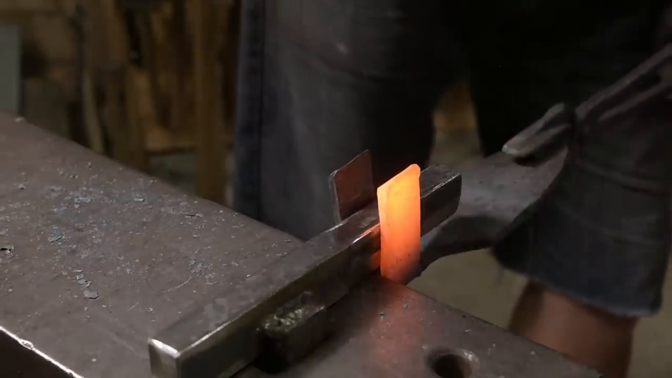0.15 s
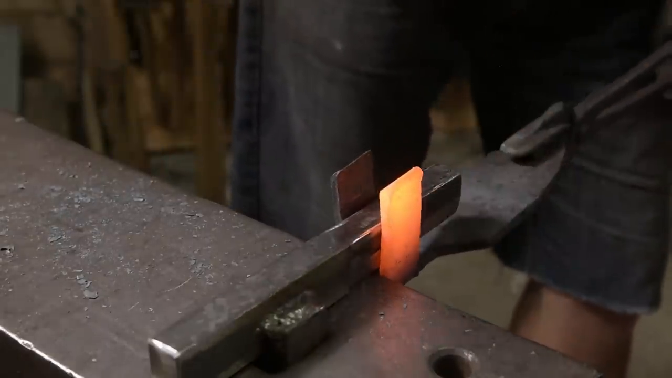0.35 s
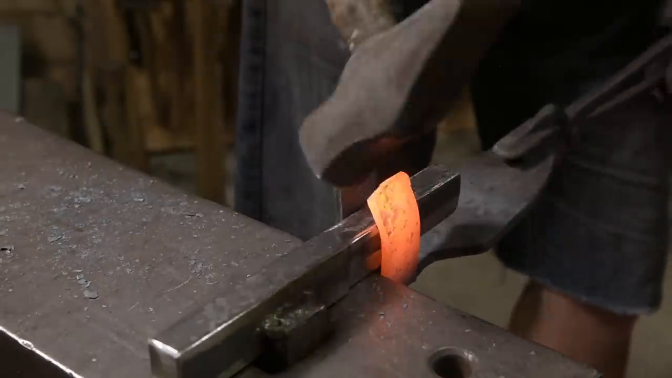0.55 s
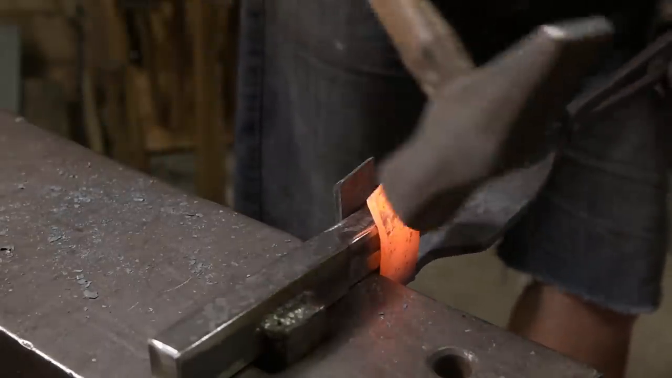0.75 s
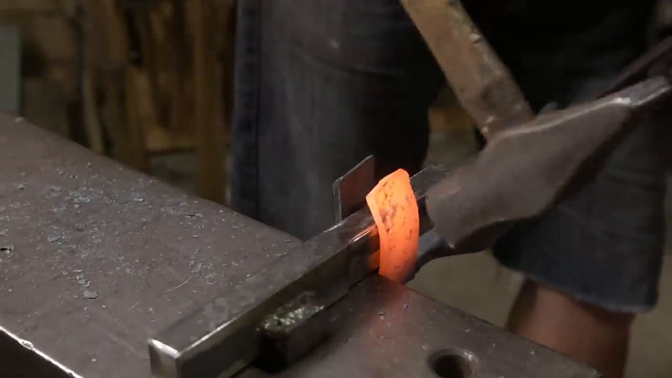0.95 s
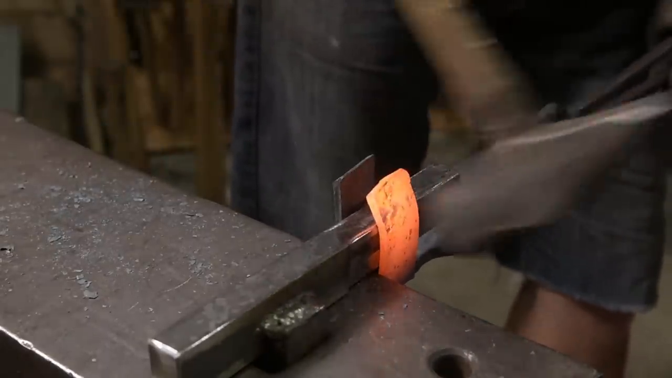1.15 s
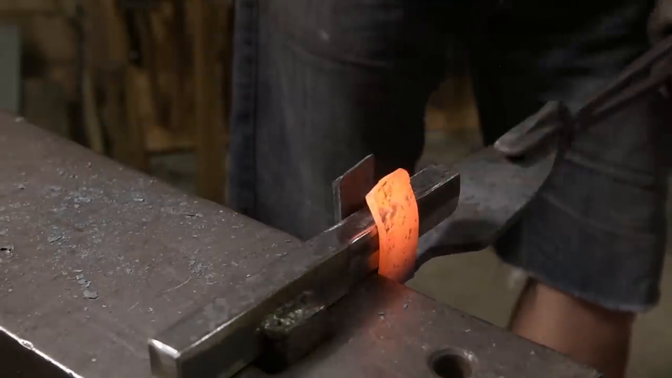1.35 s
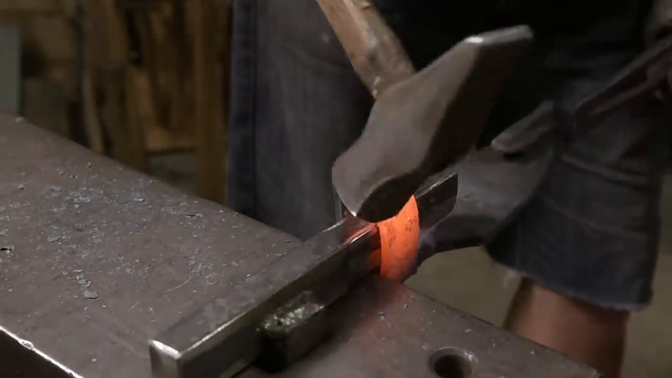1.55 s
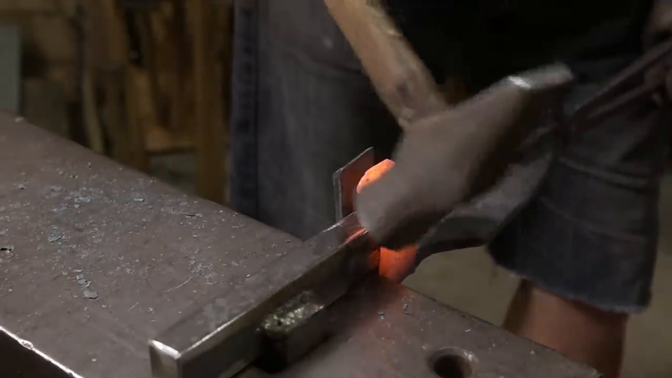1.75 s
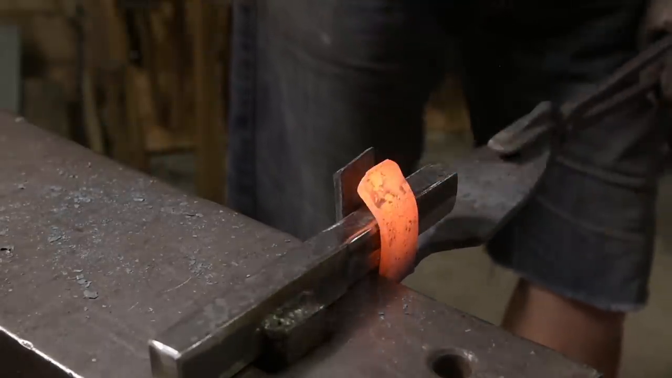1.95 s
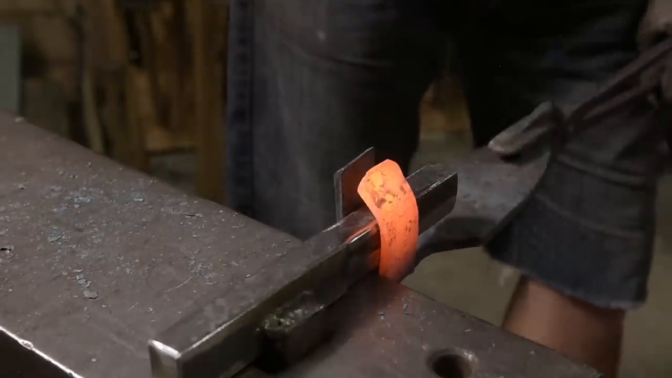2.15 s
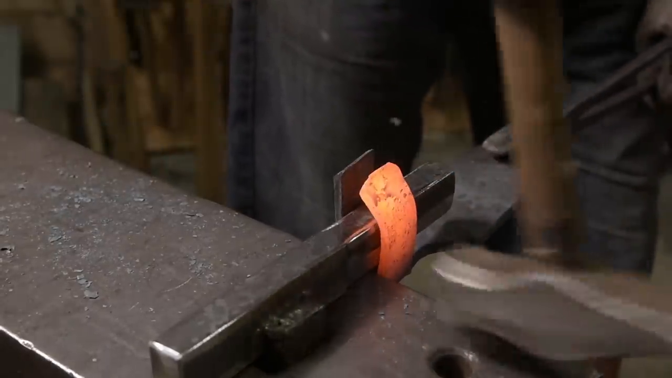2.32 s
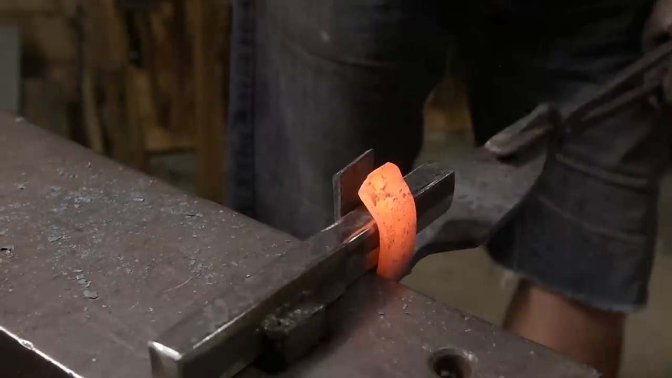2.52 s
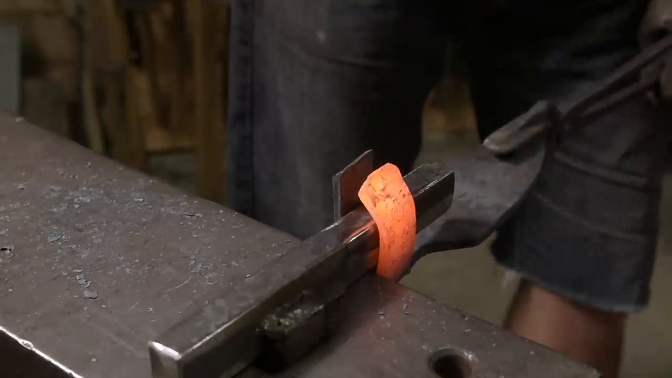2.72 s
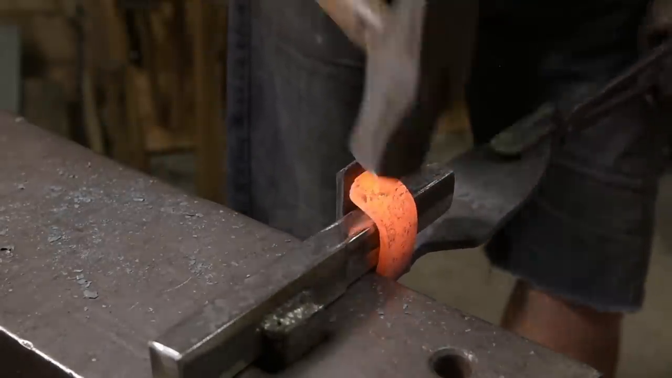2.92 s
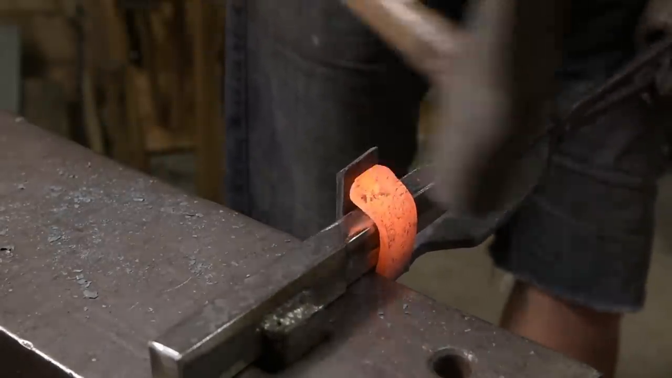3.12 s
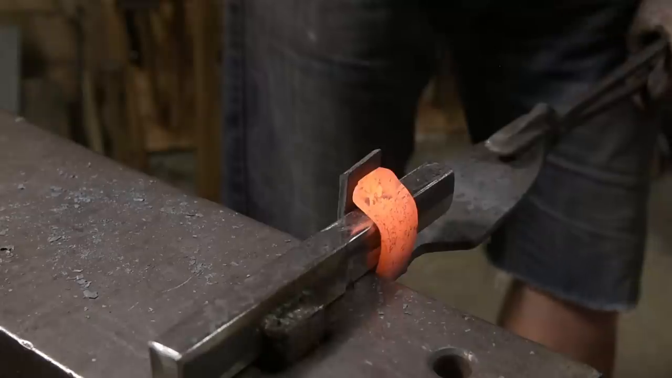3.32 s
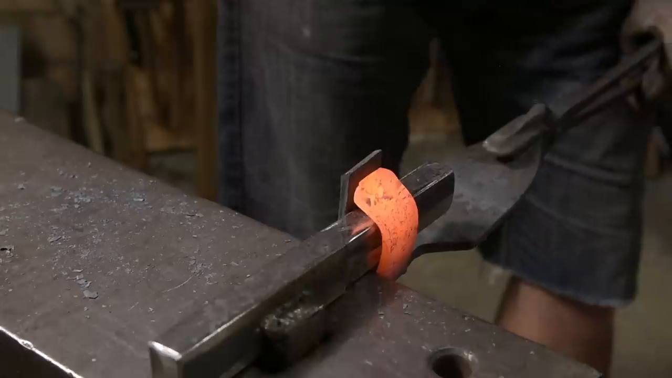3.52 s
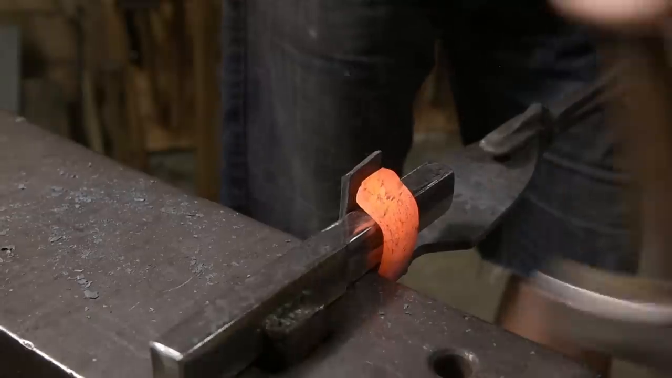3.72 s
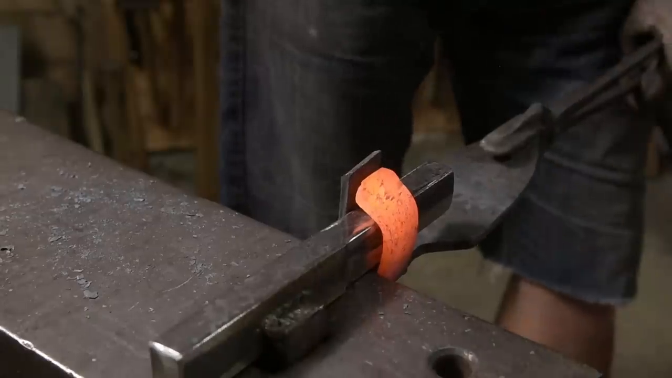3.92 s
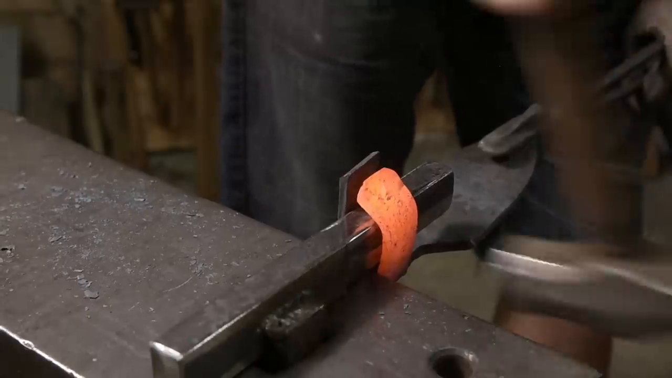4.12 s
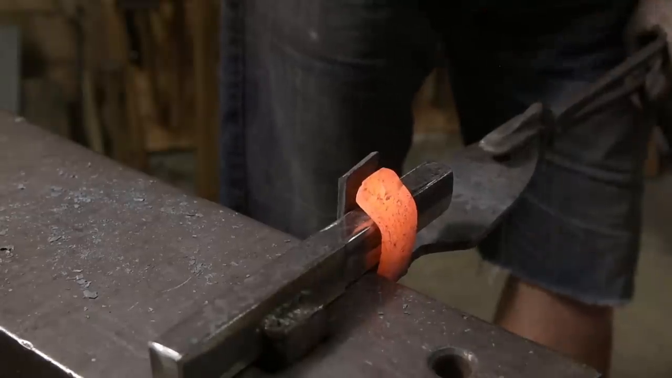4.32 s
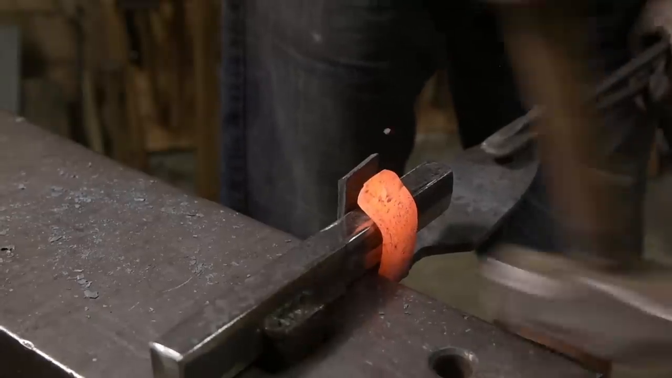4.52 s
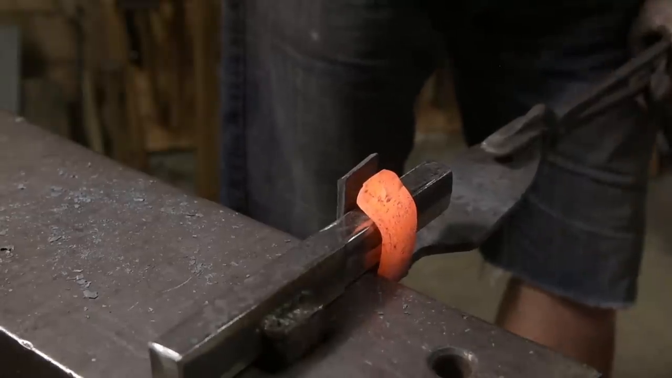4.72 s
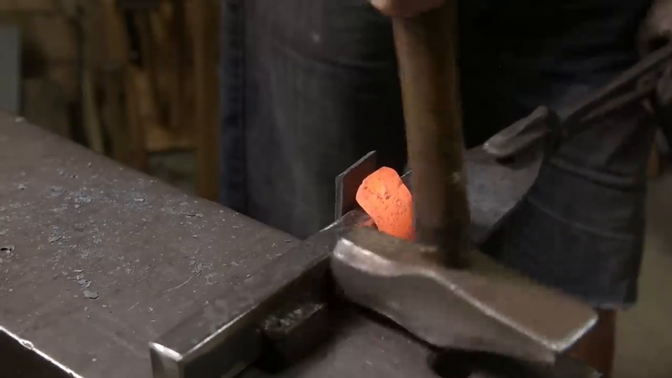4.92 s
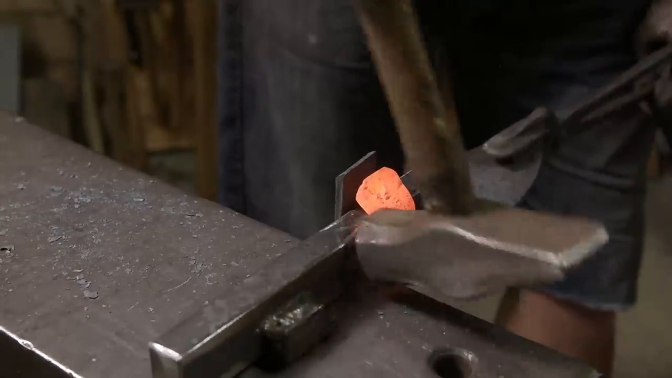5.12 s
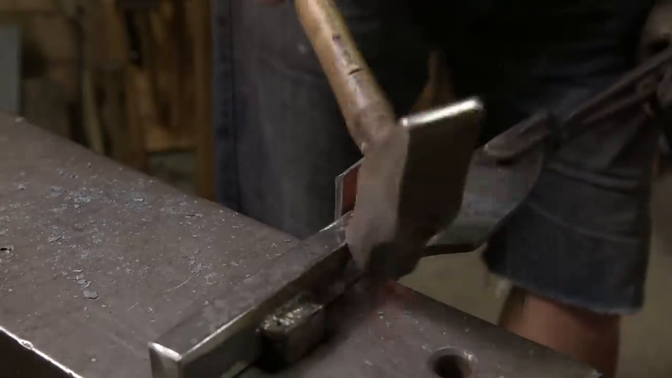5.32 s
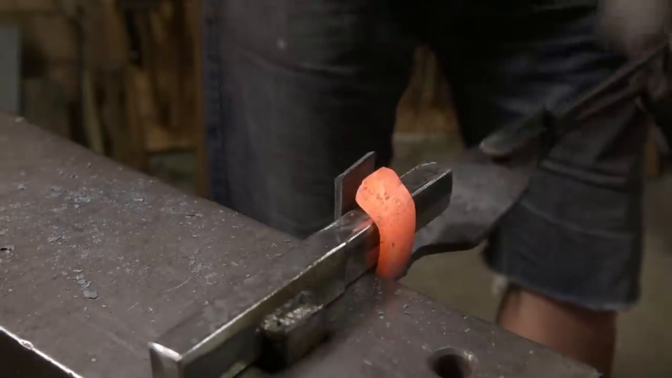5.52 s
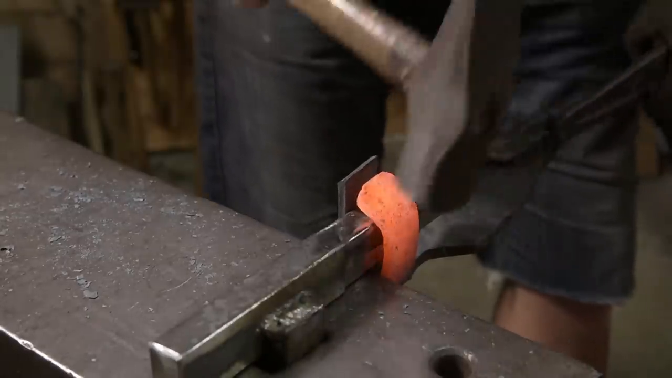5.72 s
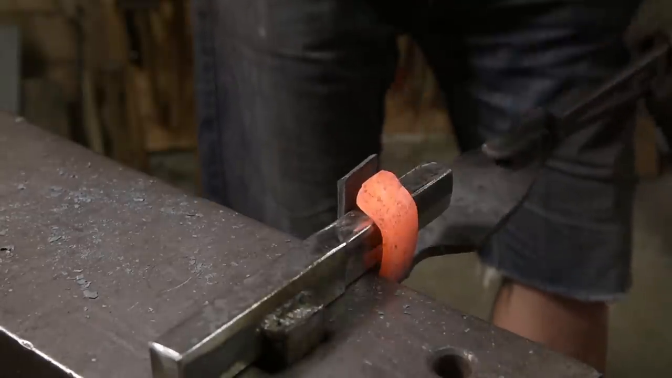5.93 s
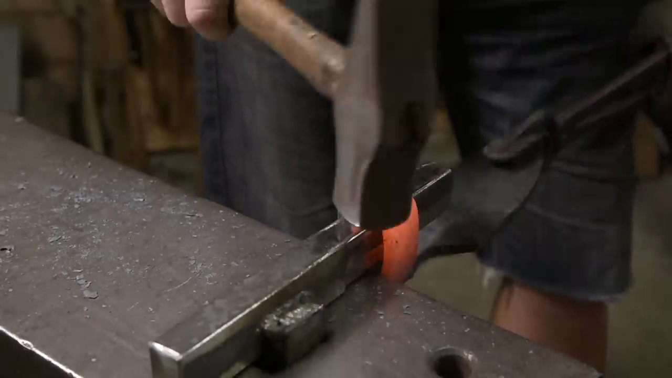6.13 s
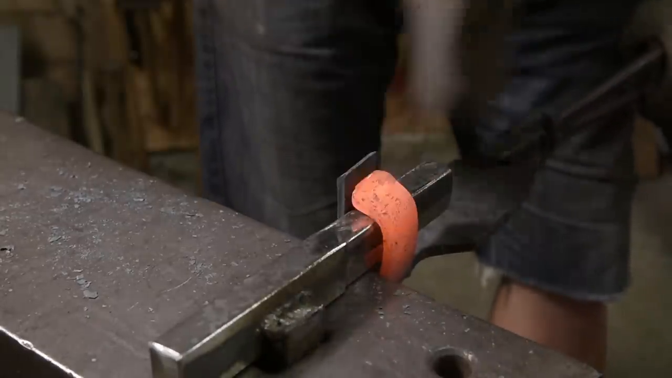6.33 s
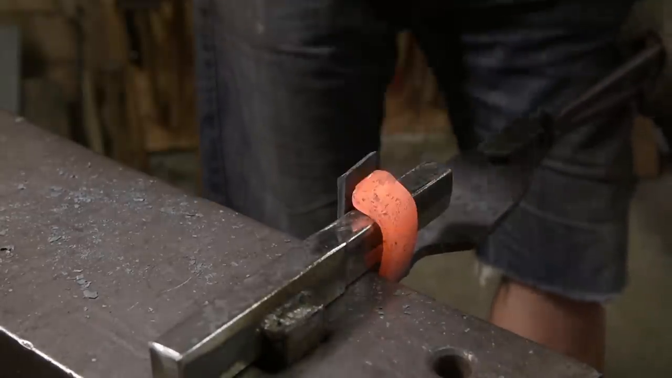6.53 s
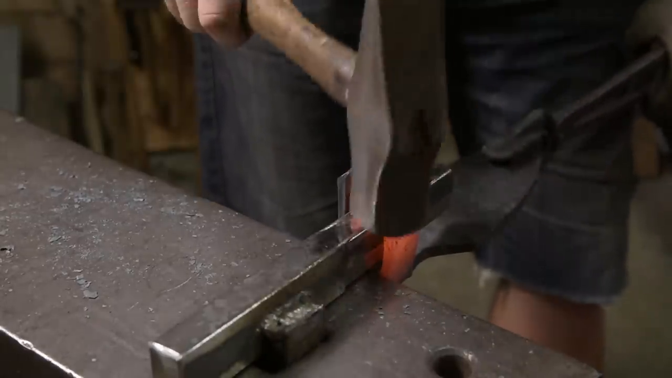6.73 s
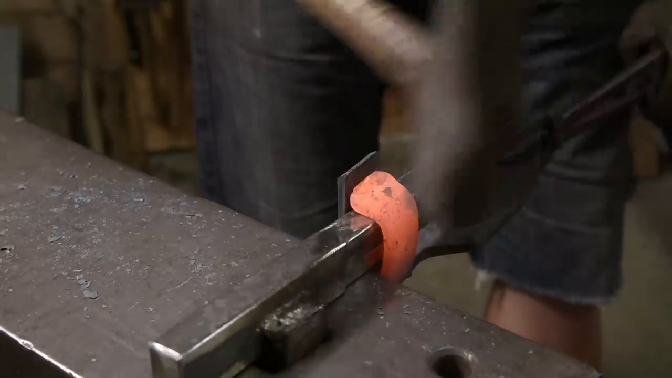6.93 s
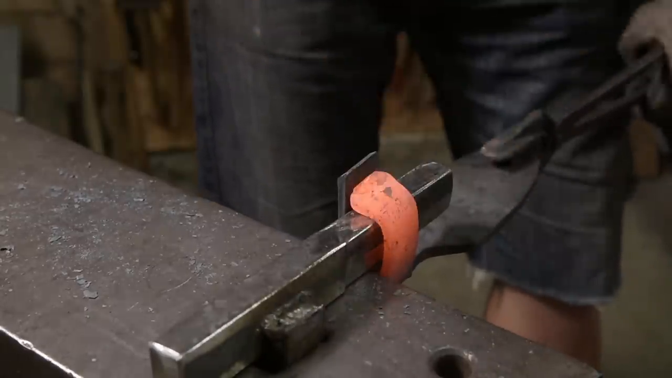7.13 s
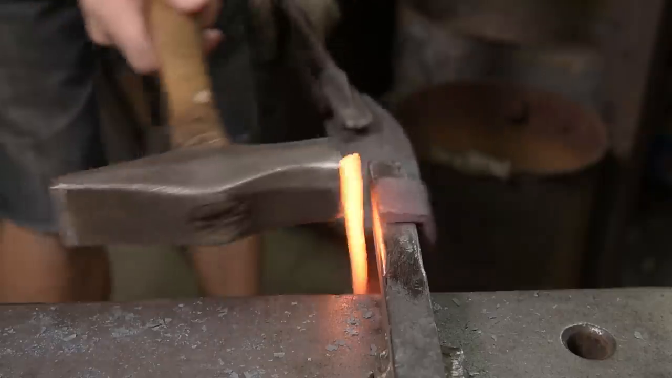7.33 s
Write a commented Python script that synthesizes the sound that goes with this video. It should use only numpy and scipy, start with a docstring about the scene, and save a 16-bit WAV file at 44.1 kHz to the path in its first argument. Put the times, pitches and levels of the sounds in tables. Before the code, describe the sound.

Close, dry hammer blows on glowing steel, some knocking sideways, some thudding, with light anvil taps, brief ringing and faint tong clinks.

```python
"""In a small smithy a hand hammer forges hot steel, held in tongs on an anvil, heard close up.
Each blow is a noise crack plus a bank of decaying sines for the well-damped anvil: blows from above thud
into the stand, blows from the side knock the tongs. At times the hammer drops back on the bare anvil.
The tongs clink and scrape as the work is turned. The shop adds a short diffuse tail, over a low rumble
of filtered noise with machine hum. Hard blows duck a limiter, and their first peaks overload."""
import sys
import numpy as np
from scipy import signal
from scipy.fft import rfft, irfft
from scipy.io import wavfile
from scipy.ndimage import uniform_filter1d

SR = 44100
rng = np.random.default_rng(int(sys.argv[2]) if len(sys.argv) > 2 else 0)


def unload_audio(sound):
    """Save the sound as a 16-bit wav file, at the path given as the first command line argument."""
    columns = np.transpose(np.atleast_2d(sound))
    # keep every value between -1 and 1, then stretch to whole-number steps
    steps = np.round(np.clip(columns, -1, 1) * 32767)
    wavfile.write(sys.argv[1], SR, steps.astype(np.int16))


N = 328986  # length in samples

RING_GROWTH = 0.55  # the ring grows more slowly than the strike: dB of ring per dB of strength


def amp(db):
    """Decibels to gain."""
    return 10 ** (np.asarray(db) / 20)


def evened(x):
    """Scales to rms 1."""
    return x / np.sqrt(np.mean(x ** 2) + 1e-20)


def read(points, hz):
    """Reads a (f/Hz, value) curve on a log-frequency axis."""
    f, value = np.transpose(points)
    return np.interp(np.log(hz + 1), np.log(f + 1), value)


def add(mix, s, sound):
    """Mixes a sound in at time s, in seconds."""
    part = mix[round(s * SR):][:len(sound)]
    part += sound[:len(part)]


def hammer(body_db=-0.5, fizz_db=1.3, ring_db=-11, side_power=4, ring_treble_share=1.1):
    """Every blow on the hot work is a crack, coloured by its angle, with the ring of the anvil."""
    # blows; the struck spot favours three anvil modes, the strongest first:
    # (t/s, strength/dB, angle from upright/deg, crack t60/s, treble/dB,
    #  clank f/Hz, clank/dB, mode lift/dB, three mode f/Hz)
    blows = [ (.4948, -12, 33, .017, -2, 1797, 3, 7, 2414, 5390, 9650),
             (1.1338, -27, 18, 0.044, 0.5, 2270, 2, 19, 2296, 3994, 3311),
             (1.5694, -11.5, 48, .019, 0.5, 3850, 10, 21.3, 2371, 3531, 4330),
             (2.321, -5.5, 73, 0.019, -1, 2570, 8, 21, 13033, 1319, 5620),
             (2.9653, -8.5, 43, 0.028, -2, 1198, 4, 14, 1307, 4900, 3774),
             (3.7196, -7.5, 84, 0.021, 1, 2400, 3, 17, 1365, 1190, 7838),
             (4.1515, -6.5, 90, .026, 3.5, 3140, 4.5, 7.8, 2800, 8520, 13033),
             (4.5469, -7.5, 83.4, 0.025, 0.5, 1080, 4.6, 19.6, 2800, 1365, 11555),
             (4.9205, -12, 82, 0.033, -5.5, 1910, 2.9, 20.4, 2450, 1365, 3994),
             (5.7813, -11.5, 15.2, 0.021, -1, 1400, 6.4, 13, 2363, 1529, 4900),
             (6.153, -12.5, 2, .018, 0, 1900, 2.6, 10, 5400, 2400, 3994),
             (6.6864, -10.8, 5, 0.032, -2, 1416, 5, 22, 2800, 1421, 3994)]
    # colour by angle: upright blows thud, glancing ones bite, side blows knock the tongs:
    # (angle/deg, thud/dB, knock/dB, bite/dB, air/dB)
    aim = [(0, 5, 2.5, 0, 2.5), (46, -3.5, -8.5, 2.5, -0.5), (91, -8.5, 8.5, 2, -3.5)]
    # modes brought out by a full side blow: (f/Hz, lift/dB)
    side_modes = [(627, 4), (11555, 18.5)]
    out = np.zeros(N)
    angles, *colours = np.transpose(aim)
    for s, strength_db, angle, t60, treble_db, clank_hz, clank_db, lift_db, *modes in blows:
        thud, knock, bite, air = (np.interp(angle, angles, column) for column in colours)
        colour = thud, knock, body_db, bite, fizz_db + treble_db, air + treble_db
        sideways = abs(angle / angles[-1]) ** side_power
        favoured = spot(lift_db, modes) + [(hz, sideways * db) for hz, db in side_modes]
        anvil_db = ring_db + RING_GROWTH * strength_db
        add(out, s, amp(strength_db) * crack(t60, colour, clank_hz, clank_db))
        add(out, s, ring(anvil_db, favoured, ring_treble_share * treble_db))
    return out


def crack(t60, colour_db, clank_hz, clank_db, rise=0.000089, clank_width=0.1,
          treble_hz=6000, treble_share=0.76, size=4096):
    """Hammer, work and tongs clash: dense modes, as shaped noise, that the soft hot steel damps quickly."""
    # spectrum of an average crack, before its colour: (f/Hz, relative level/dB)
    average = [(30, 13), (110, 26.5), (170, 24.5), (300, 27.5), (450, 26.5), (650, 30), (950, 31),
               (1350, 35), (2300, 35.5), (3000, 32.5), (4000, 31), (5200, 22.5), (8000, 20), (12000, 16),
               (16000, 11)]
    t, hz = np.arange(size) / SR, np.fft.rfftfreq(size, 1 / SR)
    burst = rng.standard_normal(size) * (1 - np.exp(-t / rise))
    # the treble lasts only a share of the time
    long_part = rfft(burst * amp(-60 * t / t60))
    short_part = rfft(burst * amp(-60 * t / (t60 * treble_share)))
    high = 1 / (1 + (treble_hz / (hz + 1)) ** 4)
    clash = (1 - high) * long_part + high * short_part
    # smoothed spectrum of the noise, divided out so that the crack follows its curves
    lumps_db = 10 * np.log10(uniform_filter1d(abs(clash) ** 2, size=37) + 1e-12)
    thud, knock, body, bite, fizz, air = colour_db
    colour = [(380, thud), (630, knock), (900, (thud + body) / 2), (1300, body),
              (2200, 0), (3900, bite), (7500, fizz), (13000, air)]
    clank = clank_db * np.exp(-(np.log((hz + 1) / clank_hz) / clank_width) ** 2)
    shape_db = read(average, hz) + read(colour, hz) + clank - lumps_db
    return irfft(clash * causal(shape_db))


def causal(db):
    """Minimum-phase response with the given gain: nothing sounds before the contact."""
    log_gain = np.log(amp(np.r_[db, db[-2:0:-1]]))
    return np.exp(np.conj(signal.hilbert(log_gain)))[:len(db)]


def ring(anvil_db, favoured, treble_db=0, treble_hz=4500):
    """All the anvil's modes ring briefly; favoured ones flash at the contact, then settle into the ring."""
    # modes of the anvil with work and tongs resting on it: (f/Hz, relative level/dB, t60/s)
    anvil = [(503, -30, .35), (627, -30, .38), (1190, -28, .36), (1319, -27, .36), (1365, -27, .4),
             (1421, -26, .38), (1529, -31, .3), (1860, -29, .38), (1965, -28, .38), (2296, -29, .25),
             (2371, -28, .3), (2400, -28, .3), (2450, -25, .34), (2800, -25, .46), (3311, -27, .26),
             (3531, -30, .33), (3774, -30, .28), (3994, -27, .4), (4330, -29, .38), (4900, -33, .34),
             (5390, -32, .24), (5620, -33, .26), (7838, -44, .3), (8070, -42, .25), (8520, -39, .33),
             (9650, -39, .28), (10900, -43, .18), (11555, -42, .35), (12314, -54, .25), (13033, -50, .3)]
    flash_db, flash_t60 = 6, 0.038  # level over the lift in dB, decay in s
    held_share = 0.8  # share of the lift, in dB, that the longer ring keeps
    t = np.arange(SR * 3 // 4) / SR
    hz, db, t60 = np.transpose(anvil)[:, :, None]
    lift = np.zeros_like(hz)
    for near_hz, lift_db in favoured:
        lift[np.argmin(abs(hz - near_hz))] += lift_db
    high = 1 / (1 + (treble_hz / hz) ** 4)
    scatter_db = 2 * rng.standard_normal(hz.shape)
    level = amp(db + anvil_db + treble_db * high + scatter_db)
    held = amp(held_share * lift - 60 * t / t60)
    flash = (amp(lift) - 1) * amp(flash_db - 60 * t / flash_t60)
    sign = rng.choice([-1, 1], len(hz))
    return sign @ (level * (held + flash) * np.sin(2 * np.pi * hz * t))


def spot(lift_db, modes, share=0.83):
    """Modes that a struck spot favours, each with a share of the lift before it: (f/Hz, lift/dB)."""
    return [(hz, lift_db * share ** rank) for rank, hz in enumerate(modes)]


def rebounds(body_db=3, bite_db=3, bite_share=0.48, air_db=-8, ring_db=-13, ring_treble_share=0.45):
    """The hammer drops on the bare face: a crack with more body and less air, and the face's own modes."""
    # drops: (t/s, strength/dB, crack t60/s, treble/dB, clank f/Hz, clank/dB, mode lift/dB, three mode f/Hz)
    drops = [ (3.083, -31.5, .02, -11, 2520, 10.2, 7, 2450, 1319, 1190),
             (3.754, -21, .02, -16.5, 1260, 13, 19.4, 1365, 2450, 1860),
             (4.597, -28, 0.027, -11, 1220, 13.4, 18, 2800, 1190, 1319),
             (5.0181, -11.5, 0.025, -10, 1435, 3, 16.6, 9650, 8520, 11555),
             (5.2021, -28, 0.053, -4, 2440, 7.5, 15, 12314, 2450, 503),
             (5.283, -36, 0.08, -23, 2450, 11, 13, 2450, 503, 1421)]
    # modes brought out by the bare face: (f/Hz, lift/dB)
    face_modes = [(503, 11.7), (1421, 6), (2450, 6)]
    # the hammer's weight lands with the same thud and knock whatever the strength
    landing_thud_db, landing_knock_db = -33.5, -30
    out = np.zeros(N)
    for s, strength_db, t60, treble_db, clank_hz, clank_db, lift_db, *modes in drops:
        thud, knock = landing_thud_db - strength_db, landing_knock_db - strength_db
        bite = bite_db + bite_share * treble_db
        colour = thud, knock, body_db, bite, treble_db, air_db + treble_db
        favoured = spot(lift_db, modes) + face_modes
        anvil_db = ring_db + RING_GROWTH * strength_db
        add(out, s, amp(strength_db) * crack(t60, colour, clank_hz, clank_db))
        add(out, s, ring(anvil_db, favoured, ring_treble_share * treble_db))
    return out


def clinks(knock_db=9.5, body_db=4.5, bite_db=3.5, fizz_db=-8, air_db=-11, clank_hz=2850, clank_db=2.6):
    """The tongs touch the anvil as the work is turned: a light crack and a faint ring."""
    # touches: (t/s, strength/dB, crack t60/s, thud/dB, anvil ring/dB)
    touches = [(6.843, -39.5, 0.034, 6, -46), (6.922, -48.5, .026, 6, -60),
               (7.332, -54.5, 0.042, 22.5, -74), (7.416, -43.5, 0.15, -4, -40.5)]
    # modes brought out by the tongs: (f/Hz, lift/dB)
    tong_modes = [(3531, 18), (3994, 7.3), (5390, 15), (7838, 18)]
    out = np.zeros(N)
    for s, strength_db, t60, thud_db, anvil_db in touches:
        colour = thud_db, knock_db, body_db, bite_db, fizz_db, air_db
        add(out, s, amp(strength_db) * crack(t60, colour, clank_hz, clank_db))
        add(out, s, ring(anvil_db, tong_modes))
    return out


def tongs(grains_per_s=2500):
    """As the work is shifted, steel slides over loose scale in a quick run of tiny random slips."""
    # scrapes: (t/s, length/s, rms level before the fades/dB)
    scrapes = [(0.382, .05, -66.5), (2.149, 0.062, -68.5), (3.621, .04, -64.5), (7.29, .055, -53)]
    # spectrum of one slip: (f/Hz, relative level/dB)
    slip_spectrum = [(100, -5.5), (1200, 0), (3300, 2), (5500, -10.5), (11000, -17), (16000, -24)]
    out = np.zeros(N)
    grain = irfft(causal(read(slip_spectrum, np.fft.rfftfreq(1024, 1 / SR))))
    slips = rng.standard_normal(N) * (rng.random(N) < grains_per_s / SR)
    for s, length, db in scrapes:
        run = slips[round(s * SR):][:round(length * SR)]
        scrape = evened(signal.lfilter(grain, 1, run))
        add(out, s, amp(db) * scrape * signal.windows.tukey(len(run), 0.3))
    return out


def floor_bounce(x, delay=0.0059, bounce_db=-12):
    """The first echo comes off the floor beside the anvil: one quieter copy, delayed by seconds."""
    out = np.zeros(N)
    add(out, delay, amp(bounce_db) * x)
    return out


def shop(x, count=4):
    """As the smith moves, the echo pattern changes: the sound crossfades round several diffuse tails."""
    turn = np.arange(N) / SR * np.pi / 2  # a quarter turn per second
    shares = [np.maximum(np.cos(turn - 2 * np.pi * k / count), 0) for k in range(count)]
    return sum(signal.oaconvolve(x * share, shop_response())[:N] for share in shares)


def shop_response(build=0.012, size=512):
    """Diffuse echoes build up as the sound reaches the walls, then die band by band."""
    # decay of the shop: (f/Hz, t60/s)
    decay = [(60, 1.8), (150, 0.49), (500, 0.66), (1500, 0.53), (4000, 0.4181), (7000, 0.3632),
             (14000, 0.41)]
    # level of the tail against the direct sound, before the build-up: (f/Hz, level/dB)
    tail_level = [(30, -4), (70, 4.5), (130, 9.5), (300, -1), (650, -7.5), (1400, -7.5), (2400, -11.5),
                  (4000, -6), (7000, -10), (14000, -19.5)]
    hz, t, z = signal.stft(rng.standard_normal(SR), SR, nperseg=size)
    t60 = read(decay, hz)[:, None]
    # gives a decay of any length the same energy
    unit_energy = np.sqrt(np.log(10 ** 6) / (t60 * SR))
    fading = amp(read(tail_level, hz)[:, None] - 60 * t / t60)
    tail = signal.istft(z * unit_energy * fading, SR, nperseg=size)[1][:SR]
    return tail * (1 - np.exp(-(np.arange(SR) / SR / build) ** 2))


def background(rumble_db=-54, low_cut_hz=46, waver_hz=6):
    """Low rushing noise at a steady rms level, with machine hum that wavers as narrow-band noise."""
    # density of the rush before its low cut: (f/Hz, relative level per Hz/dB)
    rumble = [(15, -46), (25, -28), (55, -8), (108, -9), (170, -14.5), (236, -1.5), (263, -16.5), (293, -8),
              (451, -16), (489, -9.5), (659, -16), (1230, -18), (1480, -22), (3080, -27), (16000, -60.5)]
    # hum of a machine in the shop: (f/Hz, rms level/dB)
    machine = [(98, -63.5), (200, -67.5), (237, -70.5)]
    hz = np.fft.rfftfreq(N, 1 / SR)
    low_cut = 1 / np.sqrt(1 + (low_cut_hz / (hz + 1)) ** 12)
    rush = evened(irfft(rfft(rng.standard_normal(N)) * amp(read(rumble, hz)) * low_cut, N))
    hum = np.zeros(N)
    for f, db in machine:
        narrow = 1 / (1 + ((hz - f) / waver_hz) ** 2)
        hum += amp(db) * evened(irfft(rfft(rng.standard_normal(N)) * narrow, N))
    return amp(rumble_db) * rush + hum


def scene():
    """The forging, its echoes and the background."""
    forging = hammer() + rebounds() + clinks() + tongs()
    return (forging + floor_bounce(forging) + shop(forging) + background())[None]


def record(dry, threshold_db=-13, slope=0.52, attack=0.0052, recovery_db_per_s=55, edge_hz=16100):
    """A limiter ducks just after each hard blow; first peaks slip past and overload; then a treble cut."""
    # power over 2 ms
    power_db = 10 * np.log10(abs(uniform_filter1d(dry[0] ** 2, size=88)) + 1e-12)
    # the ducking jumps to each new peak and recovers in a straight line of dB
    fall = np.arange(N) / SR * recovery_db_per_s
    wanted_db = slope * np.maximum(power_db - threshold_db, 0)
    duck_db = np.maximum.accumulate(wanted_db + fall) - fall
    # the attack (s) smooths the ducking, so it comes late
    r = np.exp(-1 / (attack * SR))
    ducked = dry * amp(-signal.lfilter([1 - r], [1, -r], duck_db))
    clipped = ducked / (1 + ducked ** 6) ** (1 / 6)
    band_limit = signal.firwin(255, edge_hz, window=("kaiser", 8), fs=SR)
    return signal.oaconvolve(clipped, band_limit[None], "same")


dry = scene()
out = record(dry)
unload_audio(out)
```